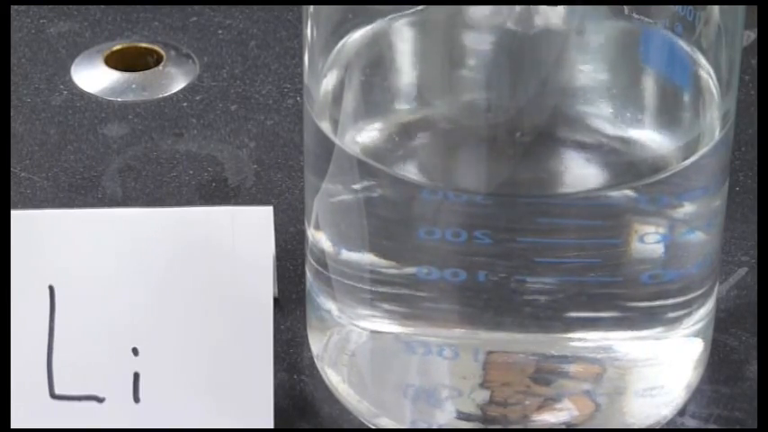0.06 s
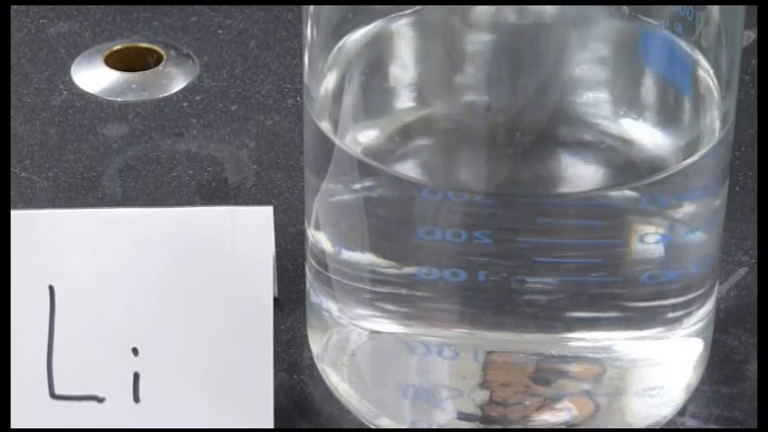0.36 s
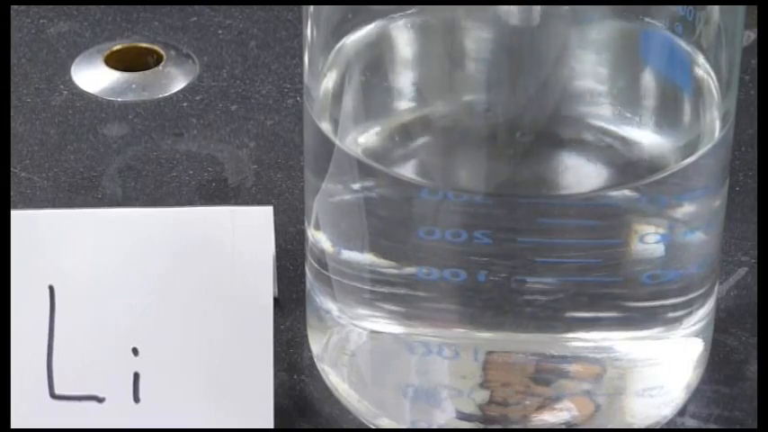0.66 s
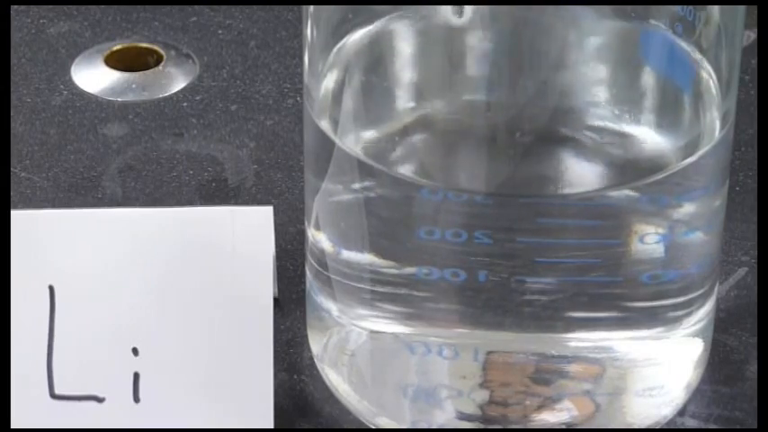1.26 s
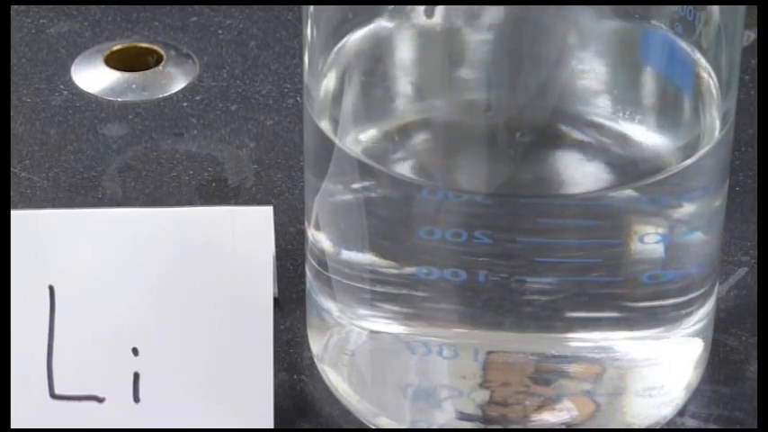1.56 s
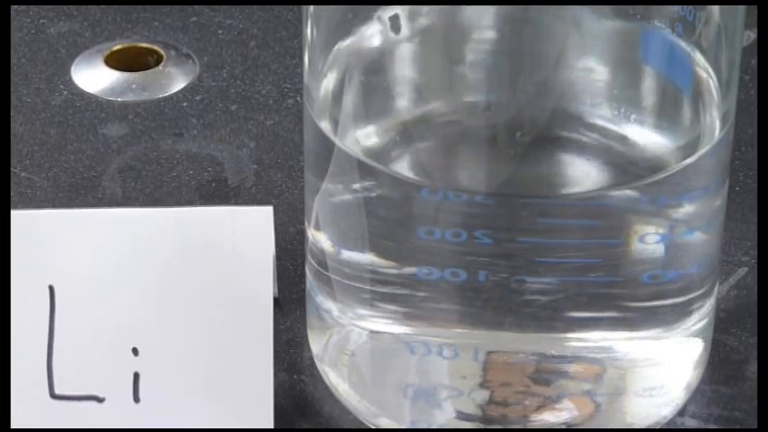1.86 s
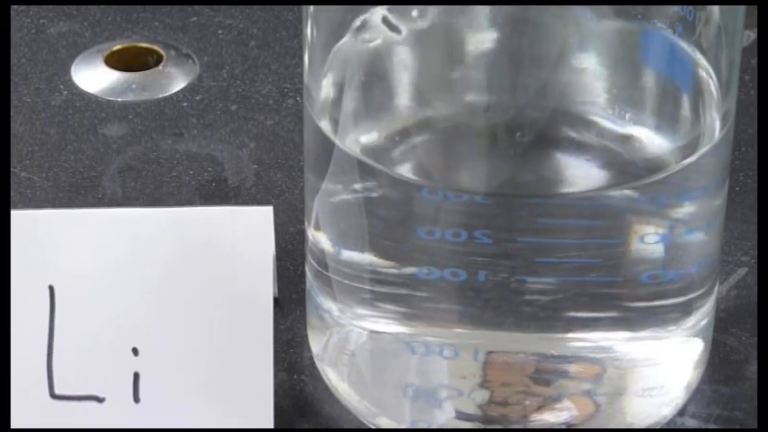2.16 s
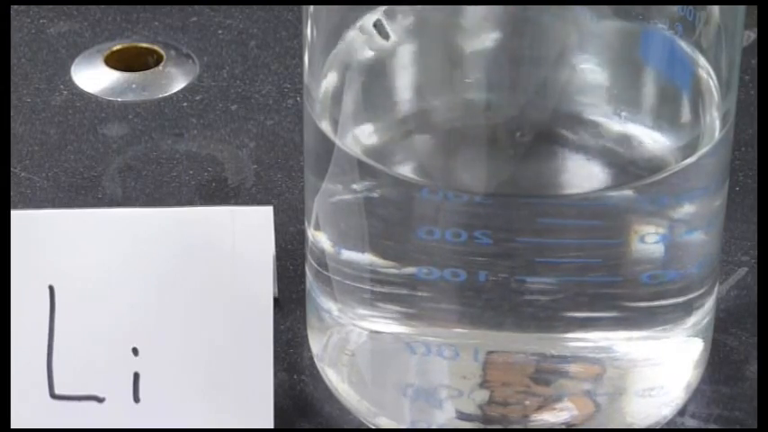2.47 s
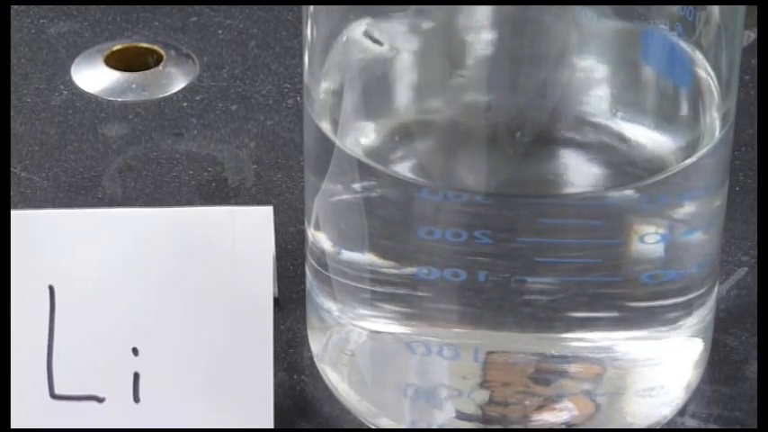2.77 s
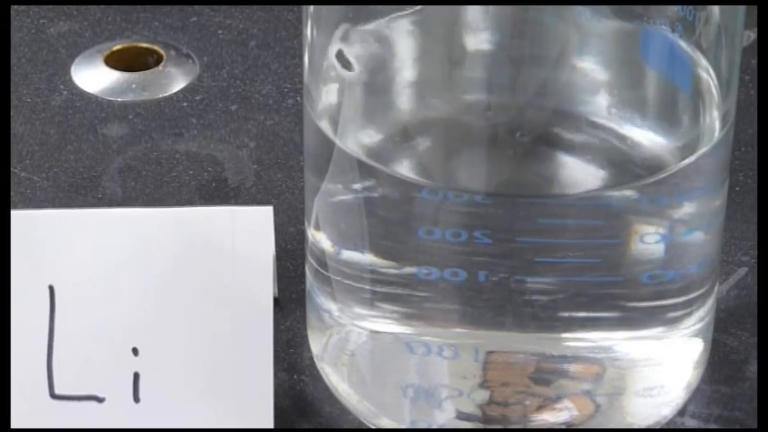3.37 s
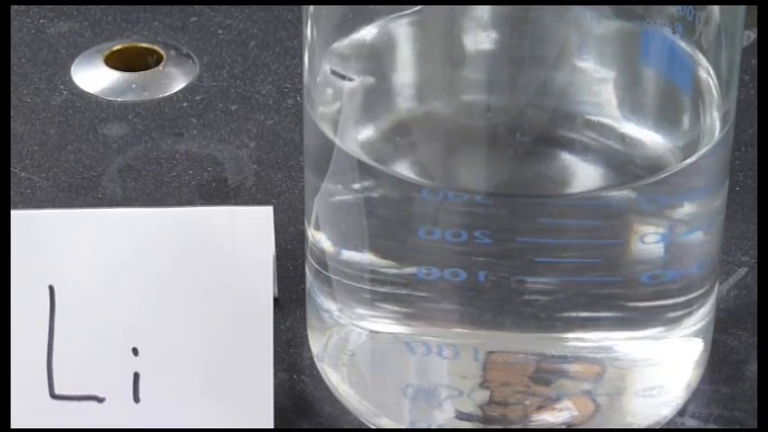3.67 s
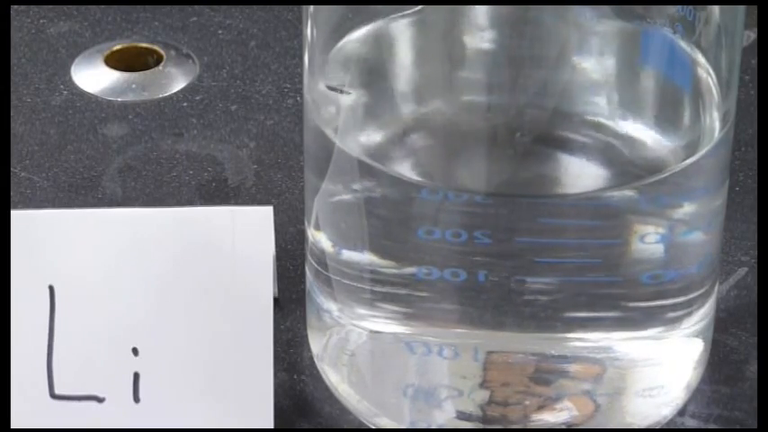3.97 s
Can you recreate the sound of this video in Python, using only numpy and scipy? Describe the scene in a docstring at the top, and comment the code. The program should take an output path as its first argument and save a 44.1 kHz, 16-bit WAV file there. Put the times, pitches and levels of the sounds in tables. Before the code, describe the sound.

Metal fizzing on water in a glass beaker, with tiny pops over rushing ventilation.

```python
"""Lithium fizzing on water.

A piece of lithium skates on water in a glass beaker, giving off hydrogen. The gas leaves in short
sizzles that climb in pitch, over a bed of tiny bursting bubbles and a few sharper pops. These excite
the beaker's resonances and echo off nearby walls. Ventilation rushes steadily underneath."""
import sys
import numpy as np
from scipy import signal
from scipy.fft import rfft, irfft, next_fast_len
from scipy.io import wavfile
from scipy.ndimage import map_coordinates

SR = 44100
rng = np.random.default_rng(int(sys.argv[2]) if len(sys.argv) > 2 else 0)


def log_audio(samples):
    """Write samples as a 16-bit WAV file to the path given in sys.argv[1]."""
    # one column per channel
    frames = np.atleast_2d(samples).T
    # limit to full scale, then quantise
    limited = np.clip(frames, -1, 1)
    pcm = np.round(limited * 32767).astype(np.int16)
    wavfile.write(sys.argv[1], SR, pcm)


N = 176400

# Spectrum of the rushing air. Each row: frequency in Hz, relative density in dB.
AIR_SPECTRUM = [(20, -24), (40, -15.5), (70, -5.5), (110, -0.5), (200, -5), (300, -8), (400, -9.5),
                (550, -14.5), (850, -18.5), (1200, -21.5), (2000, -24), (3000, -33), (4200, -38.5),
                (6500, -42.5), (11000, -52)]
# Resonances of duct and hood. Each row: frequency in Hz, width in Hz, gain over the rush in dB.
DUCT_MODES = [(61, 6.7, -6.5), (150.2, 13.8, 1.5), (207, 12.5, 0), (264, 20, 0), (289, 10, 0),
              (311.5, 10.4, 2), (612, 24, -5.5), (693.5, 6.3, -2.5), (763, 50, -5.5), (940, 9.2, 1.5),
              (969, 40, 0.5), (1225, 18, -5)]
# Spectra of the two fizz bands. Each row: frequency in Hz, relative density in dB.
FIZZ_MID_SPECTRUM = [(500, -21), (1400, -3.5), (2000, -9.5), (2400, 1), (3000, 0.5), (3600, -6.5),
                     (4500, -22.5), (11000, -37.5)]
FIZZ_TREBLE_SPECTRUM = [(1500, -26), (2900, -3.5), (3600, 1.5), (4100, -2), (5000, -1), (5700, -9),
                        (6600, -12), (11000, -14.5)]
# Strength of the fizz. Each row: time in seconds, middle level in dB, treble level in dB.
FIZZ_LEVELS = [(0, -45.5, -47.5), (.3, -46.5, -47.5), (.57, -46, -49), (.72, -49.5, -45.5),
               (1.05, -46.5, -48.5), (1.4, -47, -50.5), (1.6, -46, -52.5), (2, -48, -51), (2.5, -48, -50.5),
               (2.9, -50, -50), (3.2, -52.5, -51.5), (3.6, -51, -53), (4, -51.5, -51.5)]
# Resonances of the beaker. Each row: frequency in Hz, width in Hz, gain over the direct sound in dB.
BEAKER_MODES = [(2190, 80, -2), (3450, 73, -1.5), (3650, 130, -8), (4170, 65, -6), (4640, 100, -2.5),
                (5750, 90, -4.5), (6940, 54, -3)]
# The beaker's strongest resonances. Each row: frequency in Hz, nominal width in Hz.
RING_MODES = [(2195, 70), (3435, 88), (4660, 100)]
# How hard the drifting metal drives them. Each row: time in seconds, the three modes' levels in dB.
RING_LEVELS = [(0, -48.5, -46.5, -56), (.5, -50, -46.5, -54), (.85, -49, -45, -55),
               (1.15, -49.5, -49.5, -55.5), (1.5, -55.5, -50, -57), (1.8, -55, -56, -63),
               (2.25, -60, -57, -64), (2.6, -58.5, -54, -64), (2.95, -52, -54.5, -56.5),
               (3.3, -61.5, -52, -56.5), (3.6, -61, -49, -58), (3.82, -61, -48, -57.5),
               (4, -56, -49.5, -60)]
# Spectrum of a stray tick. Each row: frequency in Hz, gain in dB.
TICK_SPECTRUM = [(800, -19.5), (3000, -6), (5500, 1.5), (11000, 0)]
# Spurts of gas. Each row: start and length in seconds, first and last pitch in Hz, full level in dB.
GAS_SPURTS = [(0.048, 0.13, 2900, 3675, -43), (0.177, 0.082, 3400, 4080, -41.5),
              (.283, 0.028, 4300, 4670, -44), (.38, .13, 2700, 3620, -41.5),
              (0.582, 0.082, 2900, 4950, -43.5), (0.67, 0.046, 4000, 4490, -43),
              (0.753, 0.023, 3500, 4080, -47), (.797, .025, 3300, 3640, -37),
              (0.879, .11, 3000, 3710, -41.5), (0.995, 0.045, 4100, 4800, -45.5),
              (1.08, 0.057, 4600, 5070, -51), (1.182, .1, 2600, 4380, -47),
              (1.349, 0.071, 3500, 3780, -40.5), (1.47, .17, 2150, 3900, -44.5),
              (1.667, 0.052, 2300, 2730, -43), (1.779, 0.11, 2400, 4820, -47),
              (1.933, 0.097, 2200, 3890, -51), (2.06, .215, 2250, 3890, -48), (2.3, 0.093, 2400, 3100, -53),
              (2.438, 0.12, 2300, 3090, -51), (2.687, .11, 2900, 5160, -51),
              (3.068, 0.024, 4400, 5150, -45.5), (3.304, 0.05, 3300, 3780, -45),
              (3.422, .15, 4000, 4440, -49.5), (3.689, 0.15, 3900, 4300, -49),
              (3.965, .05, 3900, 4120, -49)]
# Larger bubbles bursting. Each row: start in seconds, level in dB, pitch in Hz.
LARGE_BUBBLES = [(0.163, -29.5, 5200), (0.501, -31, 5200), (0.663, -30, 5900), (.735, -33, 5400),
                 (.815, -31, 6500), (.824, -28, 6700), (.995, -31, 6500), (1.274, -31, 5800),
                 (1.416, -39, 6200), (1.621, -38, 5200), (1.741, -32, 5500), (2.027, -32.5, 6400),
                 (2.388, -32, 6600), (2.435, -35, 6900), (2.516, -33, 6200), (2.634, -37, 6900),
                 (2.719, -35, 5300), (3.135, -36, 5800), (3.231, -32, 5300), (3.875, -33, 5750)]
# Treble response of the recorder. Each row: frequency in Hz, gain in dB.
TREBLE_RESPONSE = [(6000, 0), (7000, -7.5), (7400, -19.5), (7900, -43), (8300, -37), (8900, -15.5),
                   (9600, -16), (10400, -23), (11000, -30.5)]


def amp(db):
    """Amplitude ratio of a level in dB."""
    return 10 ** (np.asarray(db) / 20)


def unit(x):
    """The signal scaled to an rms of 1."""
    return x / np.sqrt(np.mean(x ** 2) + 1e-20)


def colour(spectrum, hz):
    """Gain at hz, interpolated in dB along a logarithmic frequency axis."""
    f, db = np.transpose(spectrum)
    return amp(np.interp(np.log(hz + 1), np.log(f + 1), db))


def curves(rows):
    """Linear interpolation, sample by sample, of each column after the time."""
    times, *columns = np.transpose(rows)
    return [np.interp(np.arange(N) / SR, times, column) for column in columns]


def wobble(knots_per_s):
    """A smooth curve through Gaussian random values."""
    knots = rng.standard_normal(int(N * knots_per_s / SR) + 4)
    return map_coordinates(knots, [np.arange(N) * knots_per_s / SR])


def filtered(x, response):
    """Linear filtering: the spectrum of x is multiplied by a frequency response."""
    size = next_fast_len(N + SR // 2)
    return irfft(rfft(x, size) * response(np.fft.rfftfreq(size, 1 / SR)), size)[:N]


def resonance(f, hz, width):
    """Response of a damped oscillator, unity at its natural frequency hz."""
    return 1j * f * width / (hz * hz - f * f + 1j * f * width)


def body(f, modes, lead_rad=0):
    """Superposition of the direct sound and a set of modes, advanced in phase by lead_rad."""
    return 1 + np.exp(1j * lead_rad) * sum(amp(db) * resonance(f, hz, width) for hz, width, db in modes)


def add(track, start_s, sound):
    """Mix a sound into the track from start_s on."""
    part = track[max(round(start_s * SR), 0):][:len(sound)]
    part += sound[:len(part)]


def ventilation(level_db=-30.5, waver_db=-0.52):
    """Moving air makes broadband noise, which the duct's resonances colour."""
    air = filtered(rng.standard_normal(N), lambda f: colour(AIR_SPECTRUM, f) * body(f, DUCT_MODES))
    return unit(air) * amp(level_db + waver_db * wobble(6.9))


def beaker_response(f):
    """Interference: the beaker's modes add to the direct sound with a phase lead."""
    return body(f, BEAKER_MODES, lead_rad=0.9)


def fizz(bubbles_per_s=2500, spread_db=2.5, hiss_db=-2.5, flutter_db=1.4):
    """Shot noise: thousands of tiny bubbles burst at random, and the smallest merge into hiss."""
    out = np.zeros(N)
    for spectrum, level_db in zip((FIZZ_MID_SPECTRUM, FIZZ_TREBLE_SPECTRUM), curves(FIZZ_LEVELS)):
        strengths = amp(spread_db * np.minimum(rng.exponential(size=N), 5)) * rng.choice([-1, 1], N)
        bursts = unit(strengths * (rng.random(N) < bubbles_per_s / SR))
        hiss = amp(hiss_db) * rng.standard_normal(N)
        band = filtered(bursts + hiss, lambda f: colour(spectrum, f) * beaker_response(f))
        out += unit(band) * amp(level_db + flutter_db * wobble(35))
    return out


def beaker_ringing(flutter_db=2.5):
    """Forced resonance: noise, standing for the fizz, drives three modes that flare and fade."""
    out = np.zeros(N)
    flare = amp(flutter_db * wobble(28.05))
    for (hz, width), level_db in zip(RING_MODES, curves(RING_LEVELS)):
        ring = filtered(rng.standard_normal(N), lambda f: resonance(f, hz, 2 * width) ** 2)
        out += unit(ring * flare) * amp(level_db)
    return out


def ticks(ticks_per_s=19, level_db=-34, spread_db=1.5):
    """A Poisson process: now and then a single small bubble stands out of the fizz."""
    onsets = rng.random(N) < ticks_per_s / SR
    strengths = amp(level_db + spread_db * np.clip(rng.standard_normal(N), -2, 2))
    return filtered(onsets * strengths, lambda f: colour(TICK_SPECTRUM, f))


def sizzles(half_width_hz=550, rough_db=1.5, glide_power=1.3, swell_db=3.5, ramp_s=0.0071):
    """Narrow-band noise on a rising carrier: each spurt of gas swells, climbs and breaks off."""
    def slow_noise():
        return unit(filtered(rng.standard_normal(N), lambda f: 1 / (1 + (f / half_width_hz) ** 2)))

    out = np.zeros(N)
    flow = (slow_noise() + 1j * slow_noise()) * amp(rough_db * wobble(150))
    for start, length, first_hz, last_hz, db in GAS_SPURTS:
        t = np.arange(int(length * SR)) / SR
        hz = first_hz * (last_hz / first_hz) ** ((t / length) ** glide_power)
        carrier = np.exp(2j * np.pi * np.cumsum(hz) / SR)
        hiss = (np.roll(flow, -round(start * SR))[:len(t)] * carrier).real
        gate = np.clip(np.minimum(t, length - t) / ramp_s, 0, 1)
        swell = amp(db + swell_db * (t / length - 1))
        add(out, start, gate * swell * hiss)
    return out


def pops(ping_t60_s=0.0062, crack_t60_s=0.0098, crack_db=-1.5):
    """Damped oscillation: a larger bubble bursts with a very short ping and a dry crack of noise."""
    out = np.zeros(N)
    t = np.arange(SR // 20) / SR
    for start, db, hz in LARGE_BUBBLES:
        ping = np.sin(2 * np.pi * hz * t) * amp(-60 * t / ping_t60_s)
        crack = np.diff(rng.standard_normal(len(t) + 1)) * amp(crack_db - 60 * t / crack_t60_s)
        add(out, start, amp(db) * (ping + crack) / 2)
    return out


def walls(direct, echo_db=-9, t60_s=0.13):
    """Reverberation: reflections from the bench and nearby walls form a short, diffuse tail."""
    t = np.arange(SR // 5) / SR
    tail = rng.standard_normal(len(t)) * amp(-60 * t / t60_s)
    echo = signal.fftconvolve(direct, tail / np.linalg.norm(tail))[:N]
    return (direct + amp(echo_db) * echo) / np.hypot(1, amp(echo_db))


def scene():
    """Superposition: the reaction in its beaker adds to the rush of the ventilation."""
    transients = filtered(sizzles() + pops() + ticks(), beaker_response)
    return (walls(transients + fizz()) + beaker_ringing() + ventilation())[None]


def record(dry, limit_hz=11200):
    """Band limiting: the recorder dulls the treble and passes nothing above its limit."""
    return filtered(dry[0], lambda f: colour(TREBLE_RESPONSE, f) * (f < limit_hz))[None]


dry = scene()
out = record(dry)
log_audio(out)
```